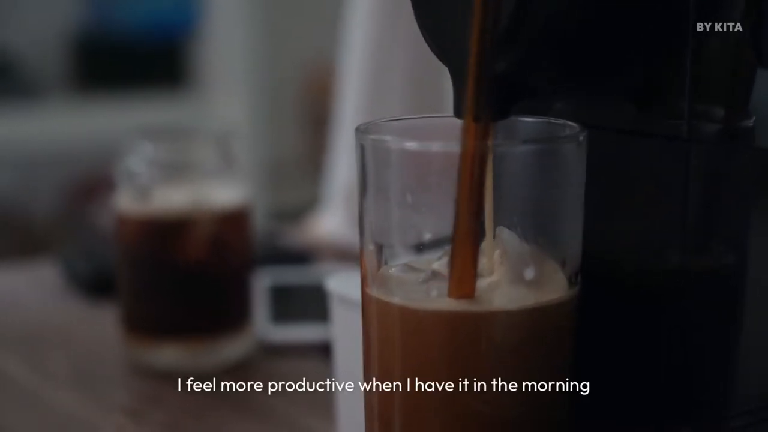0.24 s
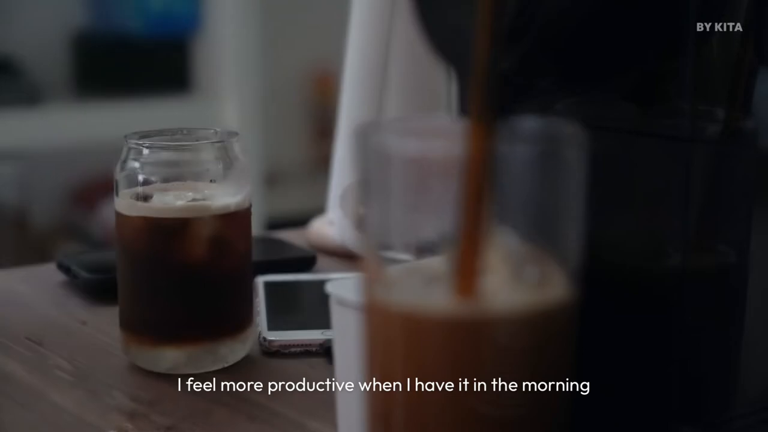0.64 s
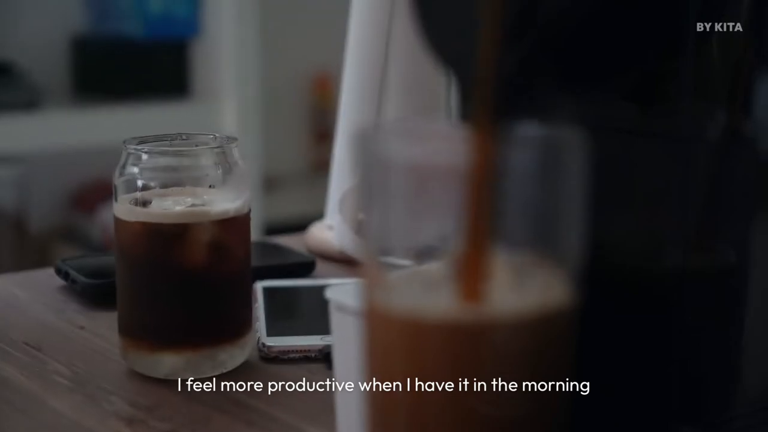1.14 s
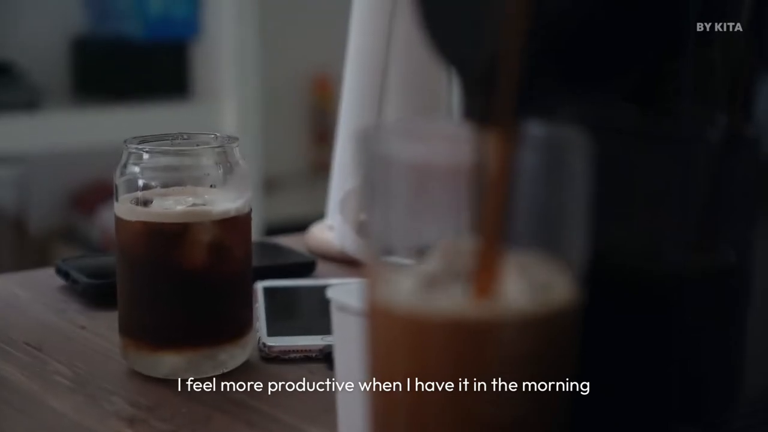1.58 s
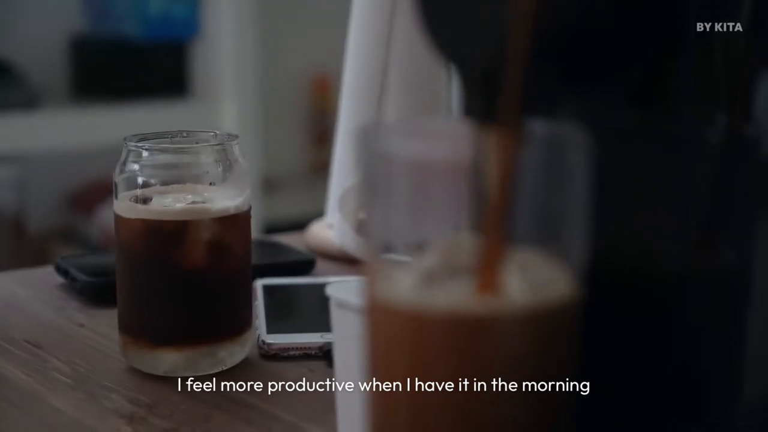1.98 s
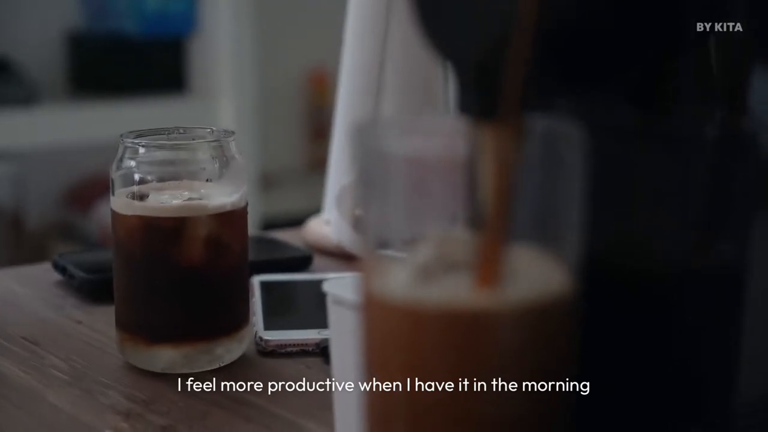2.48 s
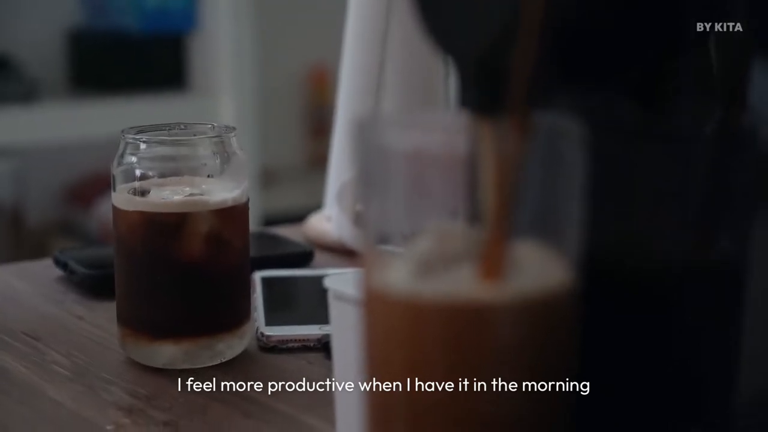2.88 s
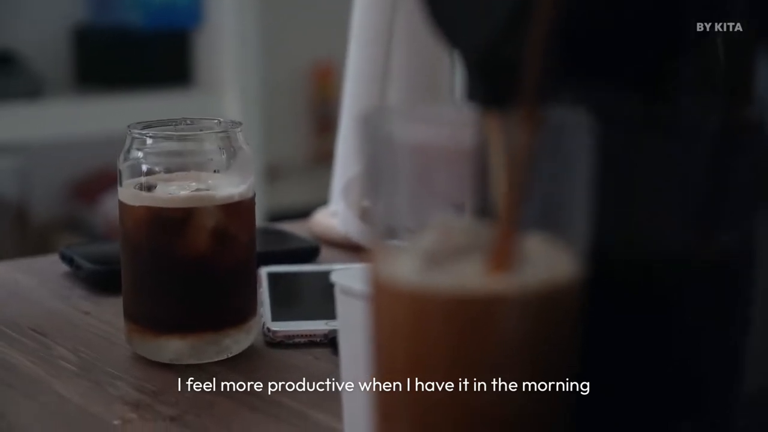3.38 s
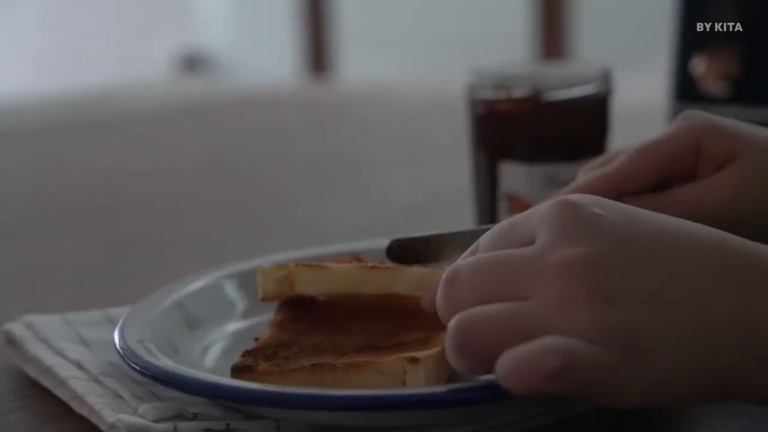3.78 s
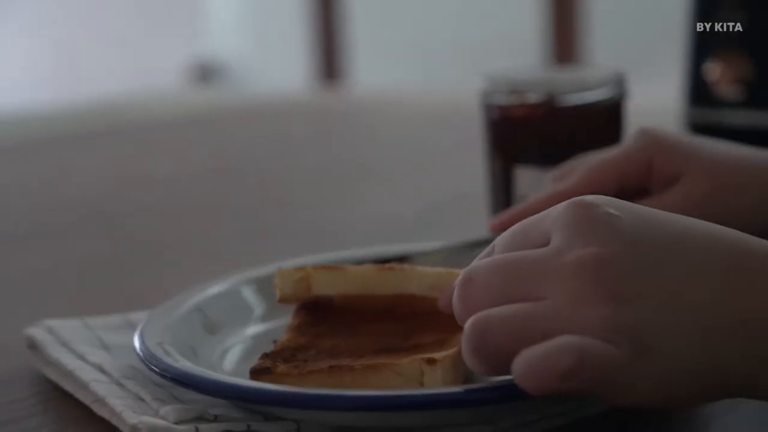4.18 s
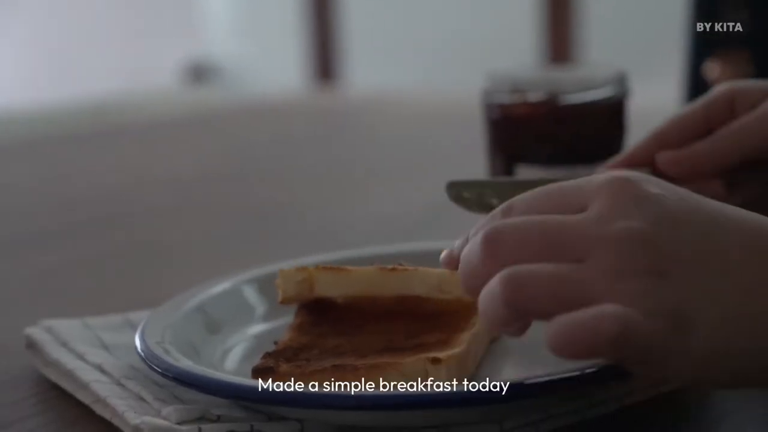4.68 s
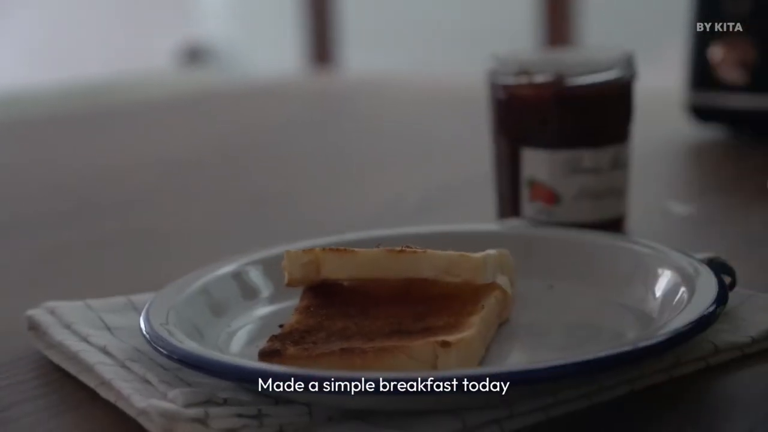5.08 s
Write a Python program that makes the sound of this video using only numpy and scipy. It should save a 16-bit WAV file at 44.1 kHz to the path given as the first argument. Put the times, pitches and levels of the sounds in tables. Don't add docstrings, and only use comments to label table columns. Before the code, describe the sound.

Steady buzzing hum of a coffee maker cuts off with a small jingling click, followed by short crunchy knife scrapes over toast.

```python
import sys
import numpy as np
from scipy import signal
from scipy.fft import rfft, irfft, next_fast_len
from scipy.io import wavfile
from scipy.ndimage import uniform_filter1d

SR = 44100
rng = np.random.default_rng(int(sys.argv[2]) if len(sys.argv) > 2 else 0)


def to_wav(s):
    ch = np.atleast_2d(s).T
    pcm = np.round(np.clip(ch, -1, 1) * 32767)
    wavfile.write(sys.argv[1], SR, pcm.astype(np.int16))


def ratio_of_db(decibels):
    return 10 ** (np.asarray(decibels, float) / 20)


N = 235714

MAINS_HZ = 49.965
STOP_S, CLICK_S, CUT_S = 3.226, 3.4484, 3.641
CUTOFF_HZ = 15790

# frequency in Hz, likeness from 0 to 1.
MACHINE_LIKENESS = [(60, 0.56), (180, 1.0), (550, 0.88), (1650, 0.33), (4970, 0.18), (15000, 0.079)]
# frequency in Hz, left over right in dB.
MACHINE_BALANCE = [(60, 5), (150, -5), (380, 3.5), (950, -0.5), (2380, -4), (5980, 5.5), (15000, 10)]
# start in seconds, rise in seconds, hold in seconds, crust level in dB,
# plate above crust in dB.
KNIFE_STROKES = [(3.732, .0015, 0.031, -45, -3.5), (4.047, .009, .002, -70, 9),
                 (4.08, 0.025, .012, -54, 4.5), (4.356, 0.033, .03, -58, 1), (4.437, .001, .006, -46, 0.5),
                 (4.461, .011, 0.017, -49, 0.5), (5.178, 0.0066, 0.0018, -62, -6),
                 (4.091, 0.0017, 0.013, -55, -3), (4.361, .006, .008, -65, 2), (4.42, .01, .006, -57.5, -1),
                 (4.493, .004, .012, -57, -3), (4.447, .003, .011, -49.5, 2), (3.795, .005, .008, -64, 2),
                 (3.835, .01, .06, -67, 4)]


def unit(x):
    return x / np.sqrt(np.mean(x ** 2) + 1e-20)


def at_hz(points, hz):
    points = np.array(points)
    return np.interp(np.log(hz + 1), np.log(points[:, 0]), points[:, 1])


def panned(x, db):
    return x * ratio_of_db(np.array([[db / 2], [-db / 2]]))


def drift(rate, count=N):
    place = np.arange(count) / SR * rate * 2
    steps = np.convolve(rng.standard_normal(int(place[-1]) + 4), [.5, .8, .5], "valid")
    return np.interp(place, np.arange(len(steps)), steps)


def two_sides(mid, side, alike):
    return np.sqrt(1 + alike) * mid + np.sqrt(1 - alike) * side * [[1], [-1]]


def air(spectrum, peaks, likeness, balance):
    size = next_fast_len(N)
    hz = np.arange(size // 2 + 1) * SR / size
    power = 1 + sum(ratio_of_db(2 * db) / (1 + (2 * (hz - at) / width) ** 4) for at, width, db in peaks)
    gain = ratio_of_db(at_hz(spectrum, hz)) * np.sqrt(power) * (hz > 18)
    mid, side = rfft(rng.standard_normal((2, size)))
    both = two_sides(mid, side, np.clip(at_hz(likeness, hz), 0, 1))
    lean = ratio_of_db(at_hz(balance, hz) / 2 * np.array([[1], [-1]]))
    return unit(irfft(gain * both * lean, size)[:, :N])


def resonate(x, hz, width):
    r = np.exp(-np.pi * width / SR)
    feedback = [1, -2 * r * np.cos(2 * np.pi * hz / SR), r * r]
    return signal.lfilter([(1 - r * r) / 2, 0, (r * r - 1) / 2], feedback, x)


def band(x, low_hz, high_hz):
    return signal.sosfilt(signal.butter(3, [low_hz, high_hz], "band", fs=SR, output="sos"), x)


def add(out, s, hz, width, db, length=.3):
    t = np.arange(int(length * SR)) / SR
    at = round(s * SR)
    ring = ratio_of_db(db) * np.sin(2 * np.pi * hz * t) * np.exp(-np.pi * width * t)
    out[at:at + len(t)] += ring[:N - at]


def gesture(s, rise, hold, db, fall, depth_db=18):
    t = np.arange(N) / SR - s
    below_db = np.maximum(depth_db * (1 - t / rise), fall * (t - rise - hold)).clip(0, 100)
    return np.where(t < 0, -150, db - below_db)


def pump():
    t = np.arange(N) / SR
    strokes = MAINS_HZ * t
    valve_db = valve_opening(strokes % 1)
    flow_db = -228 * np.maximum(t - STOP_S, 0)
    return pump_tones(t) + ratio_of_db(flow_db) * (rattle(strokes, valve_db) + whistle(valve_db))


def tone_levels(t):
    run_down_db_per_s2 = 10000
    off = np.maximum(t - STOP_S, 0)
    rocking = off - 0.02
    hum_db = 0.5 + 1.5 * np.exp(-t / 0.41) - run_down_db_per_s2 * np.maximum(rocking, 0) ** 2
    hum_db += 1.5 * np.exp(-(rocking / 0.012) ** 2)
    buzz_db = 0.86 - 0.02 * np.tanh((t - 1.9) / 0.45) + 0.34 * drift(1.5)
    return hum_db, buzz_db - run_down_db_per_s2 * off ** 2


def pump_tones(t):
    # multiple of mains, level in dB, left over right
    # in dB.
    housing_tones = [(1, -49, 0), (2, -44, 0), (3, -64, 0), (4, -67, 0), (5, -74, 0), (8, -78, -1),
                     (9, -65, -2), (11, -71, -2), (12, -69, 0),
                     (13, -71, -6), (14, -69, 0), (15, -64, 1), (16, -63, -1), (17, -67, -5), (18, -59, -3),
                  (19, -62, -4), (20, -68, 2), (21, -69, -7), (22, -69, -10), (23, -82, -13), (25, -76, -4),
                  (26, -70, -4), (27, -69, -3), (28, -70, 1), (29, -74, 2), (30, -85, -11), (31, -74, 2),
                  (32, -76, -1), (34, -78, 3), (35, -71, -8), (36, -83, -16), (37, -77, -6), (38, -82, -6),
                  (39, -79, -1), (40, -78, -6), (41, -80, -3), (42, -81, -6)]
    # Hz, width in Hz, moment as share of a stroke, level in dB.
    struck_parts = [(495, 56, 0.862, 7), (660, 30, 0.351, 7), (759, 30, 0.601, 0), (892, 32, 0.941, 5),
                    (1091, 120, 0.068, -15), (1403, 49, 0.908, -6), (1718, 82, 0.125, -9),
                    (2031, 78, 0.735, 3)]
    crest_lags = [.109, .209, .295, .075, .04]
    hum_db, buzz_db = tone_levels(t)
    hum, buzz = ratio_of_db(hum_db), ratio_of_db(buzz_db)
    span = round((STOP_S + .1) * SR)
    out = np.zeros((2, N))
    for order, db, pan_db in housing_tones + whine():
        heavy = order <= len(crest_lags)
        if heavy:
            lag = -2 * np.pi * order * crest_lags[order - 1]
        else:
            rings = sum(ratio_of_db(g) * np.exp(-2j * np.pi * order * when)
                        / (1 + 2j * (order * MAINS_HZ - hz) / width)
                        for hz, width, when, g in struck_parts)
            lag = np.angle(rings)
        lag += 1.2 * np.sin(order ** 2) * (order > 35)
        waver = min(.04 * order, 1.1) * np.array([drift(4, count=span), drift(5, count=span)])
        wave = np.cos(2 * np.pi * order * MAINS_HZ * t[:span] + lag + .17 * waver[0])
        wave *= (hum if heavy else buzz)[:span]
        out[:, :span] += panned(np.sqrt(2) * ratio_of_db(db + 1.3 * waver[1]) * wave, pan_db)
    return out


def whine():
    # Hz, width in Hz, level in dB.
    valve_body = [(2300, 240, -80), (2486, 100, -80), (3180, 170, -86.5), (3630, 150, -83),
                  (3640, 82, -81.5), (4110, 130, -90.5), (4830, 320, -91.5)]
    orders = np.arange(43, 101)
    power = sum(ratio_of_db(2 * db) / (1 + (2 * (orders * MAINS_HZ - hz) / width) ** 2)
                for hz, width, db in valve_body)
    uneven_db = np.sin(orders ** 2) + 2.5 * (-1.) ** orders
    pan_db = -7 + np.cos(orders ** 2)
    return list(zip(orders, 10 * np.log10(power) + uneven_db, pan_db))


def valve_opening(phase):
    # moment as share of a stroke, width as share of a stroke, lift in dB.
    openings = [(.69, 0.03, 6.5), (.82, 0.038, 5.5)]
    return sum(db * np.exp(-.5 * ((phase - when) / width) ** 2) for when, width, db in openings)


def rattle(strokes, valve_db):
    # frequency in Hz, level in dB per Hz.
    rattle_colour = [(30, -24), (64, -16), (115, -11.5), (200, -32), (330, -28), (480, -24.5), (560, -13),
                     (900, -9.5), (1300, -10.5), (2200, -18), (4300, -24), (8300, -24), (9300, -29),
                     (15800, -38)]
    # Hz, width in Hz, level in dB.
    rattle_rings = [(25.2, 5, 6), (40.2, 8.6, 14), (52, 5.9, 7), (88, 6, 20.5), (100, 5.1, 12.5),
                    (308, 40, 5), (450, 12, 8), (538.5, 7.8, 10.5), (898, 25, 7), (2540, 48, 3),
                    (3654, 77, 6), (5840, 150, -7), (6290, 470, 2), (7040, 260, 3.5), (8160, 290, 1.5),
                    (12800, 1100, 2)]
    noise = air(rattle_colour, rattle_rings, MACHINE_LIKENESS, MACHINE_BALANCE)
    low = signal.sosfiltfilt(signal.butter(2, 1800, fs=SR, output="sos"), noise)
    strength = np.clip(1 + 0.052 * rng.standard_normal(int(strokes[-1]) + 1), 0, 1.6)
    hiss_db = valve_db * strength[strokes.astype(int)] - 1.5 + 0.74 * drift(11)
    swell_db = 2 * np.cos(2 * np.pi * (strokes - .15))
    return ratio_of_db(-57.5) * (low * ratio_of_db(swell_db) + (noise - low) * ratio_of_db(hiss_db))


def whistle(valve_db):
    # Hz, width in Hz, level in dB.
    outlet = [(5620, 110, 1), (15500, 90, -8)]
    out = np.zeros(N)
    for hz, width, db in outlet:
        narrow = unit(resonate(resonate(rng.standard_normal(N), hz, width), hz, width))
        out += ratio_of_db(db + valve_db + 3.5 * drift(21.98)) * narrow
    open_db = -11
    narrow_db = gesture(2.2, 0.52, 0, 0, 9, depth_db=-open_db)
    return panned(ratio_of_db(-78.5 + np.maximum(narrow_db, open_db)) * out, 5.7)


def settling():
    return rocking_feet() + jingle() + ticking() + clean_contacts()


def rocking_feet():
    # start in seconds, Hz, peak in dB, t60 in seconds.
    rocks = [
        (3.277, 42, -46, 0.25),
        (3.301, 94, -49, .3),
        (3.491, 100, -56.5, 0.7),
        (3.59, 80, -55, .4),
    ]
    feet = np.zeros(N)
    for s, hz, db, t60 in rocks:
        add(feet, s, hz, 2.1 / t60, db, length=3.63 - s)
    return feet * np.ones((2, 1))


def jingle():
    # low edge in Hz, high edge in Hz, level in dB, t60 in seconds.
    thin_parts = [(7650, 9900, -57, 0.1), (7960, 9200, -56.5, 0.18), (9600, 10000, -60, .14),
                  (10300, 15700, -57, .11)]
    since = np.arange(N) / SR - CLICK_S
    out = np.zeros((2, N))
    for low_hz, high_hz, db, t60 in thin_parts:
        shimmer = unit(band(rng.standard_normal((2, N)), low_hz, high_hz))
        out += panned(shimmer * ratio_of_db(db - 60 * np.abs(since) / t60) * (since > 0), 6.6)
    return out


def ticking():
    # start in seconds, peak in dB, Hz, width in Hz, left over right in dB.
    lone_ticks = [(1.1166, -40, 2630, 1100, 2), (1.115, -52, 1400, 340, 0), (1.123, -49, 2900, 1200, 0),
                  (1.6375, -40, 6390, 2400, 11), (2.331, -45, 6900, 3200, 7), (2.989, -47, 13000, 4000, 3),
                  (3.370, -49.5, 6200, 2900, 12), (3.563, -55, 2300, 1400, 3), (3.5705, -56, 7800, 5000, 5),
                  (3.574, -56, 1300, 900, 3), (3.4585, -53, 8300, 700, 6), (3.8872, -39, 12900, 2000, 2),
                  (5.047, -53, 5900, 2500, 0), (1.1167, -60, 5550, 400, 4)]
    # peak in dB, Hz, width in Hz, left over right in dB.
    valve_click = [(-51, 9200, 740, 3), (-48, 12900, 810, 7), (-52, 10900, 680, -1), (-58, 3900, 1200, -1),
                   (-56, 6400, 900, 5), (-54, 15000, 2000, 3)]
    overtone, overtone_db = 1.77, -16.5
    overtones = [(s, db + overtone_db, hz * overtone, width, pan_db)
                 for s, db, hz, width, pan_db in lone_ticks if hz * overtone < CUTOFF_HZ]
    click = [(CLICK_S, *ring) for ring in valve_click]
    out = np.zeros((2, N))
    for s, db, hz, width, pan_db in lone_ticks + overtones + click:
        tick = np.zeros(N)
        for k, (delay, spread) in enumerate(rng.random((4, 2))):
            contact_hz = hz + width * ((k + spread) / 4 - .5)
            add(tick, s + .0009 * delay, contact_hz, 0.29 * width, 0, length=.07)
        out += panned(ratio_of_db(db - 1.5) * tick / np.abs(tick).max(), pan_db)
    return out


def clean_contacts():
    # start in seconds, peak in dB, Hz, width in Hz, left over right in dB.
    contacts = [(1.6373, -39, 5430, 320, 10), (1.6376, -38.5, 6670, 300, 11), (1.6385, -41, 7300, 300, 11),
                (1.6373, -48, 10000, 500, 6), (1.1165, -42.5, 2570, 200, 2), (1.1165, -52, 5500, 200, 5),
                (1.1168, -50, 1400, 200, 0), (1.1255, -49, 3700, 300, 0), (1.121, -52, 3700, 250, 0),
                (3.4486, -41, 9200, 230, 3), (3.4488, -51, 12900, 250, 5), (3.4486, -54, 4000, 500, 0),
                (3.4486, -54, 5500, 500, 2), (3.449, -51, 10800, 250, 0), (3.4615, -50, 8300, 250, 5),
                (3.4635, -52, 9000, 250, 5), (3.474, -54, 8700, 300, 5), (4.0815, -55, 11300, 400, 0),
                (4.0815, -57, 14500, 900, 0), (4.054, -60, 9500, 1500, 0), (4.3765, -50, 5000, 1500, 0),
                (3.5695, -58, 13000, 900, 3), (3.8872, -52, 9000, 700, 2), (4.4895, -52, 12700, 60, 0),
                (3.7355, -45, 8050, 40, 1), (3.7535, -42, 7950, 35, 1), (1.6355, -49, 4000, 500, 5),
                (3.5635, -53, 2100, 400, 2)]
    out = np.zeros((2, N))
    for s, db, hz, width, pan_db in contacts:
        contact = np.zeros(N)
        add(contact, s, hz, width, db, length=.03)
        out += panned(contact, pan_db)
    return out


def knife():
    slide_db = gesture(3.642, rise=0.02, hold=0.11, db=-64, fall=2500, depth_db=9)
    slide = unit(band(rng.standard_normal(N), 2500, 4000)) * ratio_of_db(slide_db)
    out = scraping() + panned(crumbs() + slide + singing(), .5)
    return np.array([np.roll(out[0], 1), out[1]])


def stroke_pressure():
    # level above the stroke in dB, first touch under full in dB, fall in dB per second.
    letting_go = [
        (0, 11, 450),
        (-0.5, 15, 526),
        (-6, 10, 480),
    ]
    return [np.max([gesture(s, rise, hold, db + above_db + plate_db * (k == 0), fall, depth_db)
                    for s, rise, hold, db, plate_db in KNIFE_STROKES], axis=0)
            for k, (above_db, depth_db, fall) in enumerate(letting_go)]


def scraping():
    # Hz, width in Hz, level in dB.
    plate = [(1710, 230, -7.5), (2020, 184, 9), (2250, 160, -5.5)]
    # Hz, width in Hz, level in dB.
    crust = [(3000, 310, -6), (3560, 540, 4.5), (4470, 140, -7), (5660, 280, 1.5), (6380, 250, -7.5)]
    # Hz, width in Hz, level in dB.
    blade = [(8000, 170, -7), (9650, 150, -4), (11400, 200, -3), (12500, 200, 3), (13400, 1100, -3),
             (15100, 300, 2)]
    # left-right likeness from 0 to 1, left over right in dB, unringing share.
    spreads = [
        (1, 0.5, 0.9),
        (0.5, 1, 1.1),
        (0.1, -0.5, 0.5),
    ]
    out, chatter_db = np.zeros((2, N)), 1.3 * drift(250)
    for modes, level_db, (alike, pan_db, plain) in zip((plate, crust, blade), stroke_pressure(), spreads):
        sizes = ratio_of_db(1.7 * np.minimum(rng.exponential(1, N), 4))
        sizes *= rng.random(N) < 9000 / SR
        mid, side = rng.standard_normal((2, N)) * sizes
        grit = two_sides(mid, side, alike)
        body = sum((-1) ** k * ratio_of_db(db + 1.3 * drift(40)) * unit(resonate(grit, hz, width))
                   for k, (hz, width, db) in enumerate(modes))
        broad = unit(band(grit, 0.89 * modes[0][0], 1.19 * modes[-1][0]))
        level = uniform_filter1d(ratio_of_db(level_db + chatter_db - 0.5), size=20)
        out += panned(unit(unit(body) + plain * broad) * level, pan_db)
    return out


def crumbs():
    # start in seconds, peak in dB, Hz.
    snaps = [(3.7345, -32, 4540), (3.7356, -34, 3540), (3.7395, -34, 3560), (3.7562, -35.5, 2900),
             (3.767, -34, 2420), (4.089, -40, 2350), (4.0937, -37, 2300), (4.1007, -37, 2450),
             (4.1055, -33, 2020), (4.1068, -32, 2100), (4.1095, -40, 2100), (4.115, -29, 2170),
             (4.1185, -40, 1700), (4.1218, -42, 2000), (4.3948, -41, 1800), (4.4007, -40, 2010),
             (4.415, -39, 1950), (4.375, -42, 2020), (4.438, -34.5, 4400), (4.4392, -34, 1950),
             (4.4418, -37, 4400), (4.443, -37, 2000), (4.4487, -36, 2000), (4.4506, -28.5, 2150),
             (4.456, -36, 2100), (4.4742, -26, 2150), (4.486, -38, 2600), (4.501, -37, 1960)]
    out = np.zeros(N)
    for s, db, hz in snaps:
        add(out, s, hz, 270, db - 3.5, length=.03)
        add(out, s, 5000, 4000, db - 26, length=.03)
    return out


def singing():
    # stroke number from 0, Hz, width in Hz, level in dB.
    bites = [(0, 2440, 230, -51), (0, 4800, 220, -58.5), (0, 3700, 700, -54), (0, 5760, 500, -52),
             (0, 8000, 90, -53), (0, 13000, 1200, -55), (0, 2150, 230, -57), (0, 11400, 300, -56),
             (2, 1500, 40, -55), (2, 2180, 200, -57), (7, 14900, 500, -57), (7, 12700, 400, -59),
             (7, 9300, 350, -61), (2, 5700, 300, -64), (3, 1910, 160, -54), (3, 4500, 390, -59.5),
             (3, 12800, 250, -61), (3, 15100, 200, -54), (8, 6450, 250, -67), (8, 12800, 300, -63),
             (4, 15100, 400, -62), (5, 15100, 400, -62), (4, 1950, 170, -53), (4, 4650, 410, -51),
             (5, 8150, 120, -57), (5, 9600, 150, -58), (5, 14000, 150, -65), (5, 12600, 200, -62),
             (10, 8100, 200, -63), (9, 9500, 200, -62), (7, 10000, 250, -61), (7, 6700, 300, -60.5),
             (7, 2170, 200, -51)]
    out = np.zeros(N)
    for stroke, hz, width, db in bites:
        s, rise, hold = KNIFE_STROKES[round(stroke)][:3]
        length = rise / 2 + max(hold, .012) + .012
        share = np.linspace(0, 1, int(length * SR))
        count = int(.1 * SR)
        rough = rng.standard_normal(count) * ratio_of_db(2.2 * np.minimum(rng.exponential(1, count), 4))
        voiced = unit(resonate(rough, hz, width))[-len(share):]
        at = round((s + rise / 2) * SR)
        out[at:at + len(share)] += ratio_of_db(db) * voiced * np.sin(np.pi * share ** 0.84) ** 0.68
    return out


def hand_brush():
    # frequency in Hz, level in dB per Hz.
    brush_colour = [(150, -16), (260, -3), (420, -19), (800, -8), (2200, -13), (3200, -22), (5500, -22),
                    (9500, -30), (15000, -43)]
    level_db = gesture(3.56, rise=.002, hold=.016, db=-56, fall=100) + .6 * drift(80)
    return ratio_of_db(level_db) * air(brush_colour, [], MACHINE_LIKENESS, MACHINE_BALANCE)


def counter_air():
    # frequency in Hz, level in dB per Hz.
    counter_colour = [(25, -3.5), (45, -7.5), (95, -8.5), (150, -15.5), (210, -16), (350, -27), (480, -32),
                      (600, -15), (1100, -16), (2000, -26.5), (4000, -36.5), (6300, -38), (9000, -34.5),
                      (15800, -45.5)]
    return ratio_of_db(-60) * air(counter_colour, [], MACHINE_LIKENESS, MACHINE_BALANCE)


def table_air(since):
    # frequency in Hz, level in dB per Hz.
    table_colour = [(25, -2), (62, -11.5), (170, -17), (350, -29), (480, -30.5), (530, -12.5), (650, -9),
                    (900, -10), (1500, -17.5), (2500, -24.5), (4000, -30.5), (5000, -37), (9000, -41),
                    (15800, -41.5)]
    # Hz, width in Hz, level in dB.
    table_rings = [(80, 15.5, 11.5), (98, 13, 11), (144.2, 16, 13), (211.4, 11.3, 11), (269, 9.9, 9),
                   (331, 9.7, 12.5), (400, 29, 5), (461, 12, 10), (586, 22, 0), (708.7, 15.6, 6.5),
                   (860, 38, 1.5)]
    # frequency in Hz, left-right likeness from 0 to 1.
    table_likeness = [(60, 0.95), (180, 0.91), (550, 0.97), (1650, 0.57), (4970, 0.099), (15000, 0.27)]
    # frequency in Hz, left over right in dB.
    table_balance = [(60, 3), (180, 0.0), (550, 2.0), (1650, 3), (4970, 2), (15000, -1)]
    level_db = -52.5 - 3.5 * np.exp(-np.abs(since) / 0.06) + 0.25 * drift(5.6)
    return ratio_of_db(level_db) * air(table_colour, table_rings, table_likeness, table_balance)


def room(x):
    t60_s, level_db = 0.24, -10
    t = np.arange(int(.4 * SR)) / SR
    tail = rng.standard_normal((2, len(t))) * ratio_of_db(-60 * t / t60_s) * (t > .004)
    tail = signal.lfilter([1], [1, -.3], tail)
    tail /= np.sqrt(np.sum(tail ** 2, axis=1, keepdims=True))
    return ratio_of_db(level_db) * signal.fftconvolve(x, tail, axes=1)[:, :N]


def scene():
    since = np.arange(N) / SR - CUT_S
    counter = (since < 0) * (counter_air() + hand_brush())
    table = (since > 0) * table_air(since)
    ticks, scrape = settling(), knife()
    near = ratio_of_db(-1.5) * ticks + scrape
    bright = signal.sosfilt(signal.butter(2, 500, "high", fs=SR, output="sos"), near)
    fade = np.where(since > 0, 1, np.clip(-since / 0.017, 0, 1))
    return fade * (pump() + counter + table + ticks + scrape + room(bright))


def band_limit(x):
    return signal.sosfilt(signal.butter(12, 16490, fs=SR, output="sos"), x)


def record(dry):
    mid, side = (dry[0] + dry[1]) / 2, (dry[0] - dry[1]) / 2
    side = signal.sosfiltfilt(signal.butter(2, 260, "high", fs=SR, output="sos"), side)
    side = side + ratio_of_db(-54) * mid
    top_cut = signal.ellip(10, .5, 60, CUTOFF_HZ, fs=SR, output="sos")
    mix = signal.sosfilt(top_cut, [mid + side, mid - side])
    return band_limit(mix)


dry = scene()
out = record(dry)
to_wav(out)
```